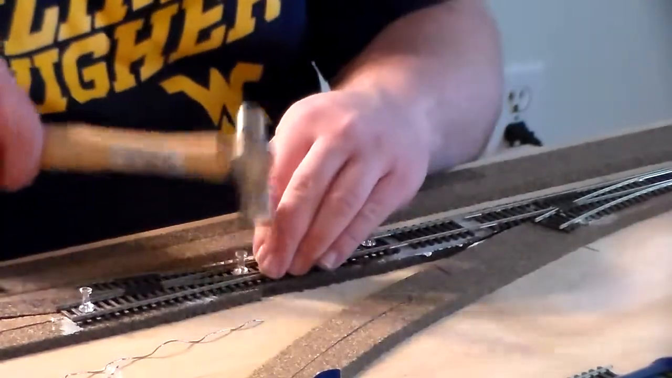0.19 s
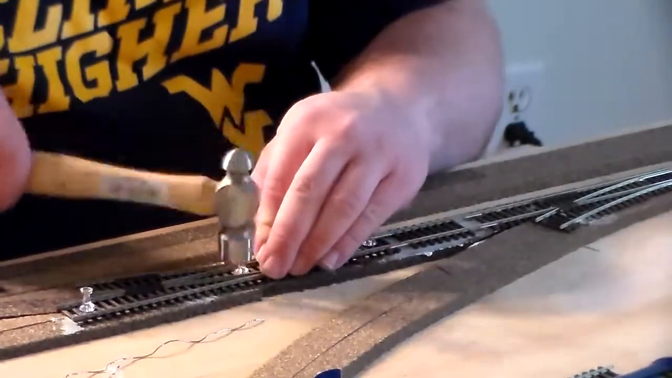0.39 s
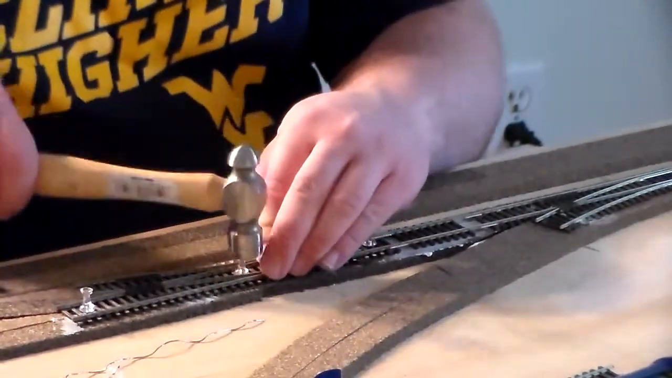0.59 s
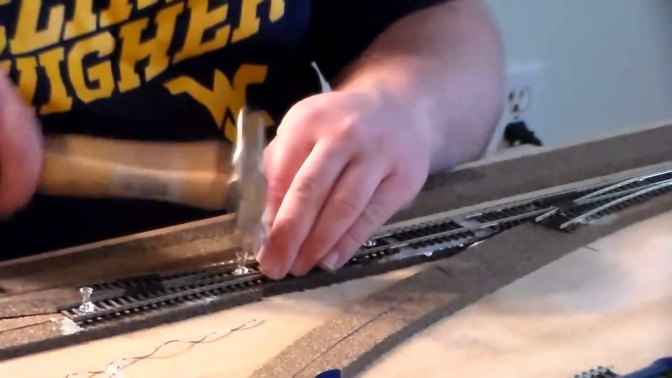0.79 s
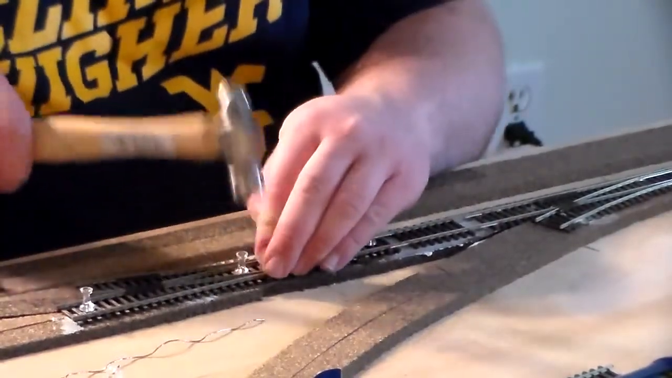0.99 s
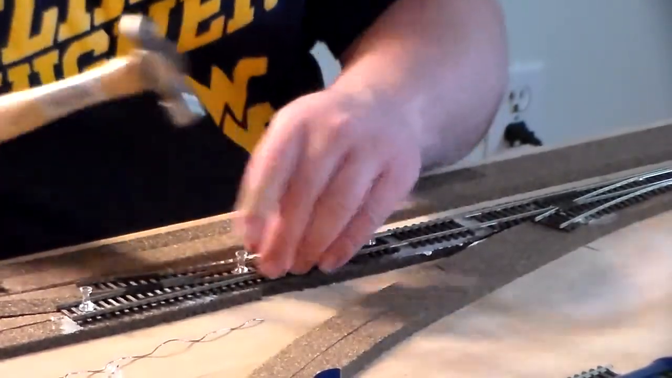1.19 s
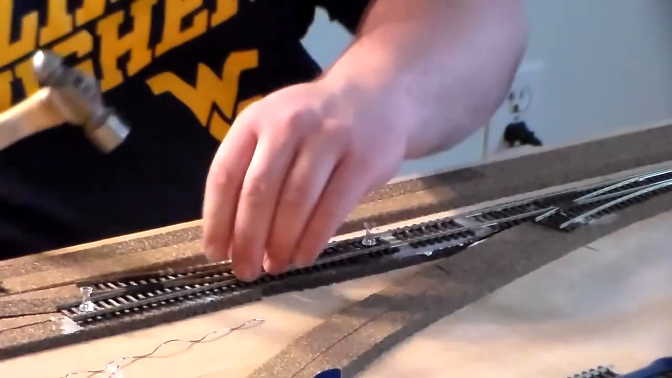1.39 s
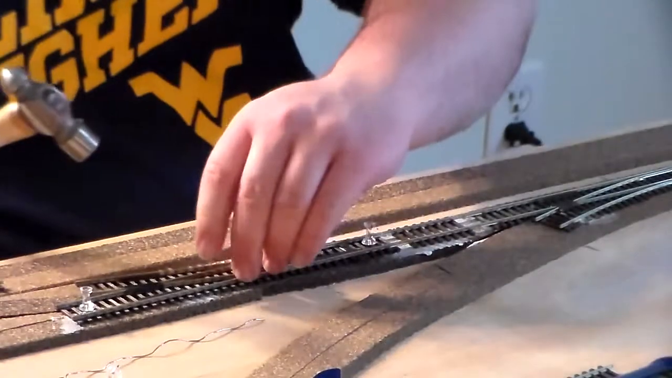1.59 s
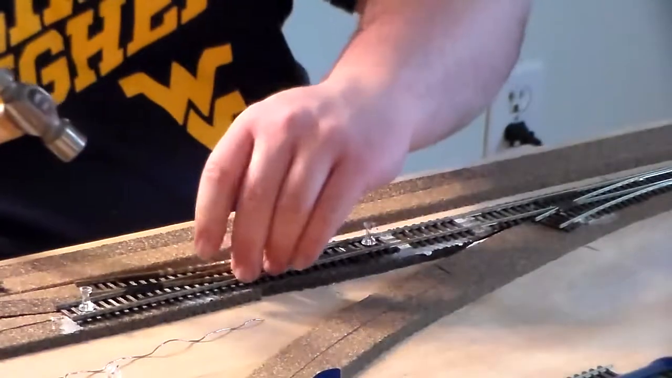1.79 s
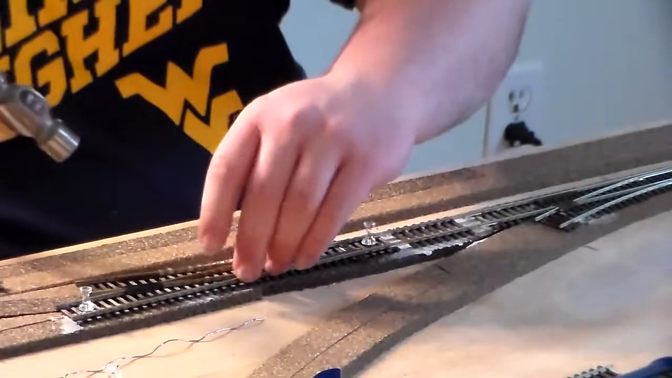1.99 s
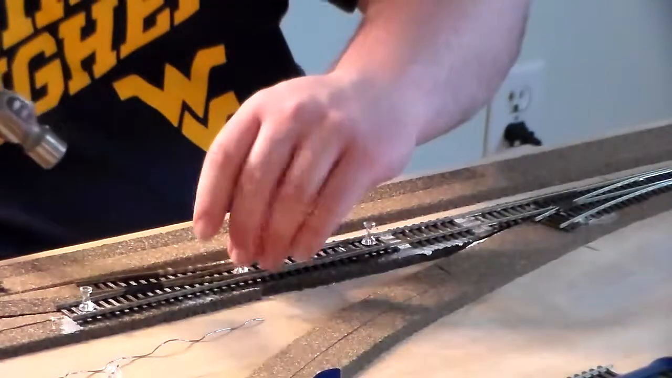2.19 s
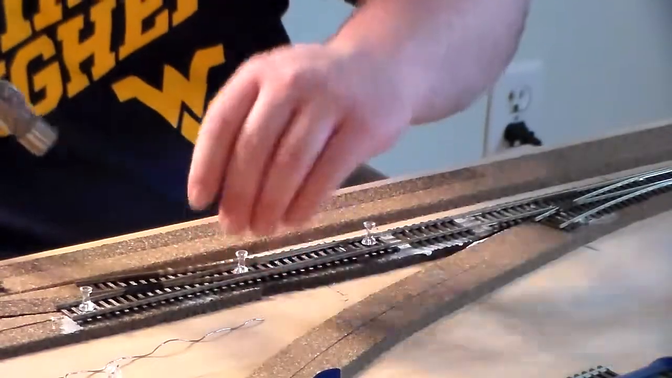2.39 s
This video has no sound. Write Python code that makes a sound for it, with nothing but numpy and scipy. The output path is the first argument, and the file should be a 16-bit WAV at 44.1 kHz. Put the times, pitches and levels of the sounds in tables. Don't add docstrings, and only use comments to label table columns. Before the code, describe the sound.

Four sharp hammer taps on a push pin, woody table knock, then a tiny scrape and soft finger brushes

```python
import sys
import numpy as np
from scipy import signal
from scipy.io import wavfile
from scipy.ndimage import uniform_filter1d

SR = 44100
rng = np.random.default_rng(int(sys.argv[2]) if len(sys.argv) > 2 else 0)


def gain_from_db(level_db):
    decades = np.asarray(level_db, float) / 20
    return 10 ** decades


def store_pcm(level_fs):
    pcm = np.round(np.clip(level_fs, -1, 1) * 32767).astype(np.int16)
    wavfile.write(sys.argv[1], SR, np.atleast_2d(pcm).T)


N = 105840
CLICK_RISE_S = 0.0005


def evened(x):
    return x / np.sqrt(np.mean(x ** 2) + 1e-20)


def read(points, hz):
    f, value = np.transpose(points)
    return np.interp(np.log(hz + 1), np.log(f + 1), value)


def add(mix, s, sound):
    part = mix[..., round(s * SR):][..., :sound.shape[-1]]
    part += sound[..., :part.shape[-1]]


def ring(hz, db, t60, length=0.5):
    t = np.arange(0, length, 1 / SR)
    return gain_from_db(db - 60 * t / t60) * np.sin(2 * np.pi * hz * t)


def noise(size, count, colour, same, t60=None, patchy_db=0):
    hop = size // 4
    frames, hz = count // hop + 5, np.fft.rfftfreq(size, 1 / SR)
    a, b, c, d, p = rng.standard_normal((frames, len(hz), 5)).T
    like = np.clip(read(same, hz), -1, 1)[:, None]
    left = a + 1j * b
    right = like * left + np.sqrt(1 - like ** 2) * (c + 1j * d)
    patches = uniform_filter1d(uniform_filter1d(p, size=6, axis=0), size=4, axis=1)
    z = np.array([left, right]) * gain_from_db(read(colour, hz)[:, None] + patchy_db * evened(patches))
    scale = np.sqrt(np.mean(signal.istft(z, nperseg=size, noverlap=size - hop)[1] ** 2))
    if t60:
        z = z * gain_from_db(-60 * np.arange(frames) * hop / SR / read(t60, hz)[:, None])
    return signal.istft(z, nperseg=size, noverlap=size - hop)[1][:, :count] / scale


# frequency in Hz, level in dB.
AIR_COLOUR = [(12, -41), (20, 3), (76, -7), (121, -10), (169, -14), (445, -16), (865, -24), (13400, -35),
              (15000, -36)]
# frequency in Hz, left-right likeness from 0 to 1.
AIR_LIKENESS = [(60, 0.81), (180, 0.7), (540, 0.59), (1630, 0.25), (4890, 0), (14700, 0.12)]


def room_air():
    return gain_from_db(-53.5) * noise(size=2048, count=N, colour=AIR_COLOUR, same=AIR_LIKENESS, patchy_db=0.25)


# frequency in Hz, level in dB, waver from 0 to 1.
HUM_LINES = [(30, -59.5, 0), (59.9, -62.5, 0.27), (92.2, -78.5, 0.8), (120.7, -57.5, 0), (244, -67, 0.49),
             (338, -69, 0.14), (445, -72.5, 0.87), (192.7, -70, 0)]


def hum():
    t, out = np.arange(N) / SR, 0
    for hz, db, waver in HUM_LINES:
        drift_hz = hz * 0.023 * rng.standard_normal(6)
        drift = sum(np.exp(2j * np.pi * (f * t + rng.random())) for f in drift_hz)
        line = np.exp(2j * np.pi * (hz * t + rng.random()))
        out = out + gain_from_db(db) * np.sqrt(2) * (line * (1 + waver * drift / 2)).real
    return out


# frequency in Hz, t60 in seconds.
ROOM_DECAY = [(150, 0.69), (500, 0.52), (2000, .5), (5000, 0.48), (12000, 0.38)]
# frequency in Hz, left-right likeness from 0 to 1.
ROOM_LIKENESS = [(60, 0.83), (180, 1), (540, 0.9), (1630, 0.91), (4890, 0.67), (14700, 0.08)]


def room_tail(colour):
    bass_rise_s, rise_s = 0.018, 0.009
    x = noise(size=256, count=SR, colour=colour, same=ROOM_LIKENESS, t60=ROOM_DECAY, patchy_db=1.5)
    x = signal.sosfilt(signal.butter(N=4, Wn=146, btype="high", fs=SR, output="sos"), x)
    bass = signal.sosfiltfilt(signal.butter(N=2, Wn=810, fs=SR, output="sos"), x)
    t = np.arange(SR) / SR
    bass_swell = 1 - np.exp(-(t / bass_rise_s) ** 2)
    swell = 1 - np.exp(-(t / rise_s) ** 2)
    return bass * bass_swell + (x - bass) * swell


# centre in seconds, level in dB, width in seconds.
BRUSH_STROKES = [
    (1.36, -73, .06),
    (1.59, -61.5, 0.062),
    (1.775, -59, 0.055),
]
# frequency in Hz, level in dB.
BRUSH_COLOUR = [(300, 9), (900, -1), (2000, -1), (4000, -21), (8000, -30)]


def fingers():
    t = np.arange(N) / SR
    shape = sum(gain_from_db(db) * np.exp(-((t - s) / width) ** 2) for s, db, width in BRUSH_STROKES)
    return shape * noise(size=256, count=N, colour=BRUSH_COLOUR, same=ROOM_LIKENESS, patchy_db=2.5)


def swing():
    centre_s, width_s, hz = 0.93, 0.0084, 60.4
    t = np.arange(N) / SR - centre_s
    return gain_from_db(-35) * np.exp(-(t / width_s) ** 2) * np.sin(2 * np.pi * hz * t)


# start in seconds, level in dB, pitch in Hz, t60 in seconds, room tail in dB.
PIN_TICKS = [(0.5136, -14.5, 3900, 0.0036, -68), (0.5143, -14.5, 11900, 0.0024, -55),
             (0.7535, -26, 12500, .003, -55), (0.9805, -23.5, 7500, 0.0033, -49),
             (1.1745, -41, 4440, 0.0092, -65), (1.1776, -35, 3920, 0.0067, -49),
             (1.1843, -44, 10800, 0.015, -55), (1.185, -34, 6700, .004, -65.5),
             (1.1864, -31.5, 3950, .008, -66), (1.332, -50, 3420, 0.007, -59.5),
             (1.38, -55.5, 2020, .03, -67)]
# frequency in Hz, level in dB.
SLIP_COLOUR = [(300, -7), (1500, -2), (4000, -1), (6000, -8), (11000, -13), (14000, -18)]


def pin_ticks():
    out, answer = np.zeros((2, N)), room_tail(SLIP_COLOUR)
    soft = np.minimum(np.arange(0, 0.5, 1 / SR) / CLICK_RISE_S, 1)
    for s, db, hz, t60, tail_db in PIN_TICKS:
        add(out, s, ring(hz, db, t60)[None] * soft)
        add(out, s, gain_from_db(tail_db) * answer)
    return out


def slip():
    slip_s, growth_s, length_s = 1.173, 0.0074, 0.031
    catches_per_s, grit_db = 1800, 3.5
    out = np.zeros((2, N))
    t = np.arange(0, 0.15, 1 / SR)
    catches = rng.random(len(t)) < catches_per_s / SR
    grit = uniform_filter1d(catches * gain_from_db(grit_db * rng.exponential(1, len(t))), size=8)
    scrape = noise(size=256, count=len(t), colour=SLIP_COLOUR, same=ROOM_LIKENESS) * evened(grit + 0.02)
    add(out, slip_s, gain_from_db(-43) * scrape * (0.32 + t / growth_s) * np.exp(-t / length_s * 2))
    add(out, slip_s, gain_from_db(-46.5) * room_tail(SLIP_COLOUR))
    return out


# frequency in Hz, level in dB, t60 in seconds.
TABLE_MODES = [(164, -20.5, 0.33), (228, -17.3, 0.215), (319, -14.1, 0.107), (371, -17.2, 0.49),
               (404, -9.8, 0.319), (430, -18.5, 0.607), (446, -14.9, 0.292), (475, -8.8, 0.204),
               (503, -10.7, 0.343), (528, -17.7, 0.607), (560, -19.4, 0.512), (587, -6.8, 0.061),
               (637, -25.8, 0.607), (673, -12.6, 0.071)]
MODE_SIGNS = [-1, 1, 1, 1, 1, -1, -1, 1, 1, -1, -1, -1, -1, -1]


def table():
    longest_t60_s = 0.4
    spread_db = 0.7 * rng.standard_normal(len(TABLE_MODES))
    x = ring(1023, -13.5, 0.017)
    for (hz, db, t60), sign, more_db in zip(TABLE_MODES, MODE_SIGNS, spread_db):
        x = x + sign * ring(hz, db + more_db, min(t60, longest_t60_s))
    return x


# frequency in Hz, level in dB, t60 in seconds.
HEAD_MODES = [(5530, -56, 1), (4670, -63, 0.22)]


def head():
    detune = 1 + 0.02 * rng.uniform(-0.44, 1, (2, 7))
    return np.array([sum(ring(hz * d, db, t60) for hz, db, t60 in HEAD_MODES for d in side) for side in detune])


def click(db, hz, t60, bright_db):
    bright_hz, bright_t60_s, length_s = 12200, 0.0075, 0.02
    t = np.arange(0, length_s, 1 / SR)
    grit = gain_from_db(bright_db - 60 * t / bright_t60_s) * rng.standard_normal((2, len(t)))
    body = ring(hz, 0, t60, length_s) + ring(0.72 * hz, -13, t60, length_s)
    edge = ring(bright_hz, bright_db - 8.5, bright_t60_s, length_s)
    rise = np.minimum(t / CLICK_RISE_S, 1)
    return gain_from_db(db) * rise * (body + edge + grit) * gain_from_db([[-0.6], [0.6]])


TAP_TIMES = [
    .2468,
    .5104,
    .7503,
    .9767,
]
# table blow in dB, room tail in dB.
TAP_LEVELS = [(-14.5, -23.5), (-11.5, -24), (-8, -20.5), (-11.5, -25.5)]
# level in dB, pitch in Hz, t60 in seconds, bright edge in dB.
TAP_CLICKS = [(-2.5, 4300, 0.0032, -28.5), (-10.5, 4020, 0.0063, -14.5), (5, 3580, 0.0019, -31),
              (-2, 3690, 0.003, -26)]
REBOUND_DELAYS = [0, .0025, .0059]
# level in dB, share of the pitch.
REBOUND_CLICKS = [
    (2, 0.95),
    (-9.5, 0.51),
    (-7, 0.714),
]
# frequency in Hz, level in dB.
BLOW_TAIL_COLOUR = [(130, -11.5), (480, -2.5), (1000, -15), (1600, -17), (3600, -18.5), (5600, -30),
                    (8000, -34), (13500, -38.5)]


def hammer():
    click_lead_s = 0.0001
    own = 0.45
    out, shared = np.zeros((2, N)), room_tail(BLOW_TAIL_COLOUR)
    for s, (blow_db, tail_db), (click_db, hz, t60, bright_db) in zip(TAP_TIMES, TAP_LEVELS, TAP_CLICKS):
        add(out, s, gain_from_db(blow_db) * table() * gain_from_db([[0.4], [-0.4]]))
        add(out, s, head() * gain_from_db(tail_db + 22))
        for delay, (db, share) in zip(REBOUND_DELAYS, REBOUND_CLICKS):
            add(out, s - click_lead_s + delay, click(click_db + db, hz * share, t60, bright_db))
        answer = np.sqrt(1 - own ** 2) * shared + own * room_tail(BLOW_TAIL_COLOUR)
        add(out, s, gain_from_db(tail_db) * answer * gain_from_db([[-0.4], [0.4]]))
    return out


def scene():
    return room_air() + hum() + fingers() + swing() + pin_ticks() + slip() + hammer()


# time in seconds, gain in dB.
CAMERA_GAIN = [(0, 0), (0.251, 0), (0.298, -6), (.36, -9), (.42, -15), (.5, -20), (0.518, -1), (.6, -7.5),
               (.66, -11.5), (.72, -16), (0.758, -5.5), (0.812, -3), (.95, -3.5), (1.051, 2), (1.15, 1.5),
               (1.3, 0), (2.4, 0)]
# frequency in Hz, level in dB.
HISS_COLOUR = [(20, -14), (90, -5.5), (200, -23), (2000, -28), (14000, -30.5)]


def camera(dry):
    s, db = np.transpose(CAMERA_GAIN)
    gain = gain_from_db(np.interp(np.arange(N) / SR, s, db))
    hiss = gain_from_db(-67) * noise(size=2048, count=N, colour=HISS_COLOUR, same=AIR_LIKENESS)
    low_pass = signal.firwin(255, 14250, window=("kaiser", 8), fs=SR)
    return signal.oaconvolve(dry * gain + hiss, low_pass[None], "same")


def top_cut(x):
    return signal.sosfilt(signal.butter(12, 15280, fs=SR, output="sos"), x)


def record(dry):
    mix = camera(dry)
    return top_cut(mix)


dry = scene()
out = record(dry)
store_pcm(out)
```